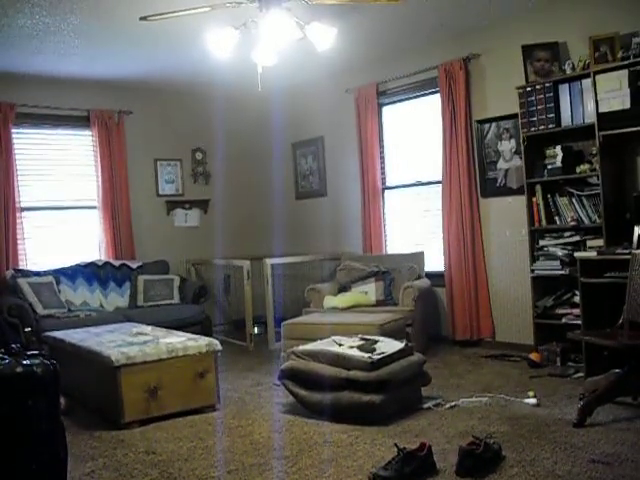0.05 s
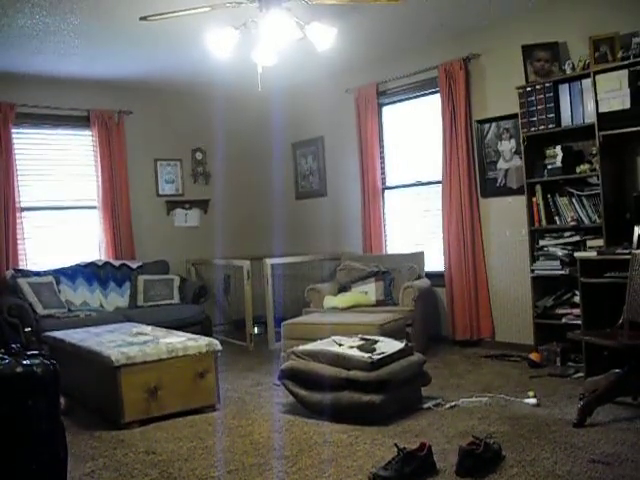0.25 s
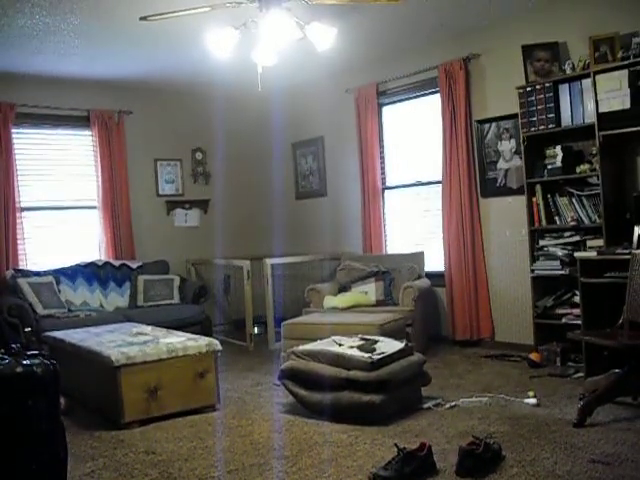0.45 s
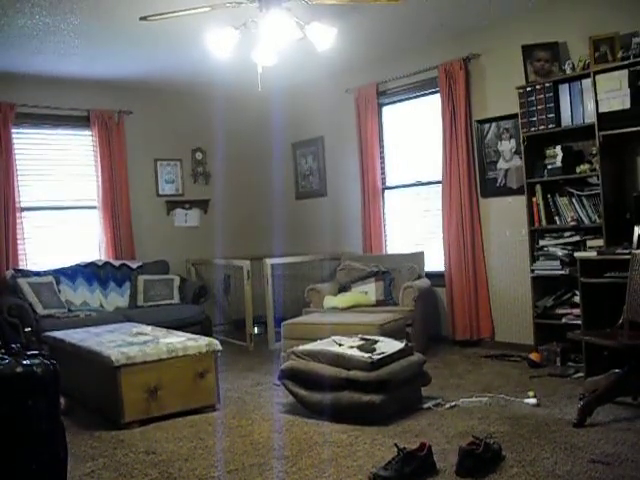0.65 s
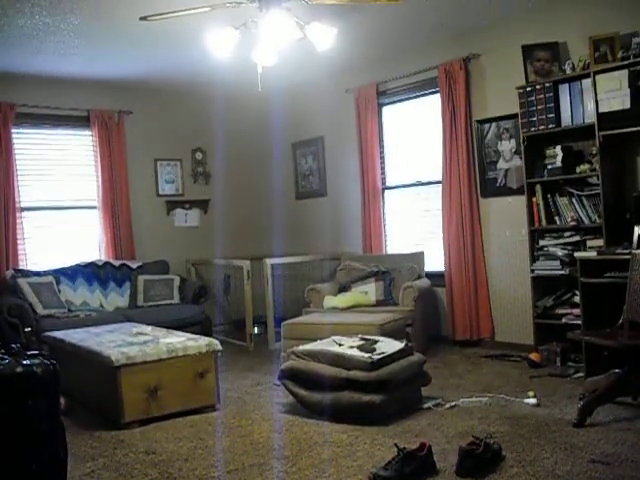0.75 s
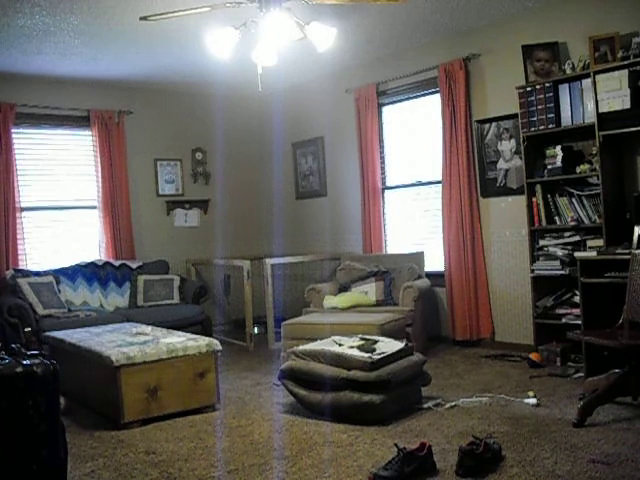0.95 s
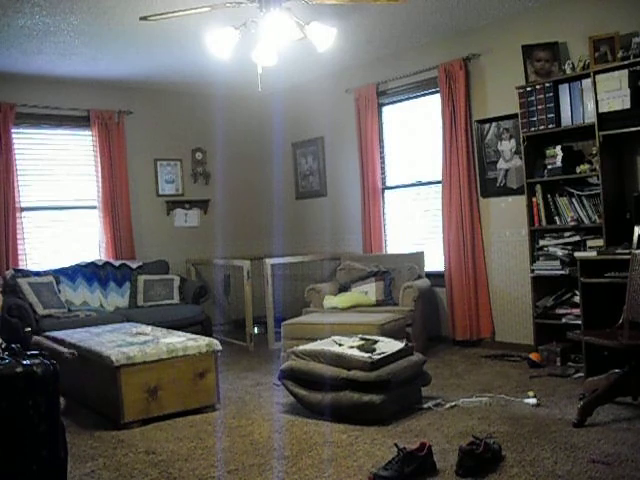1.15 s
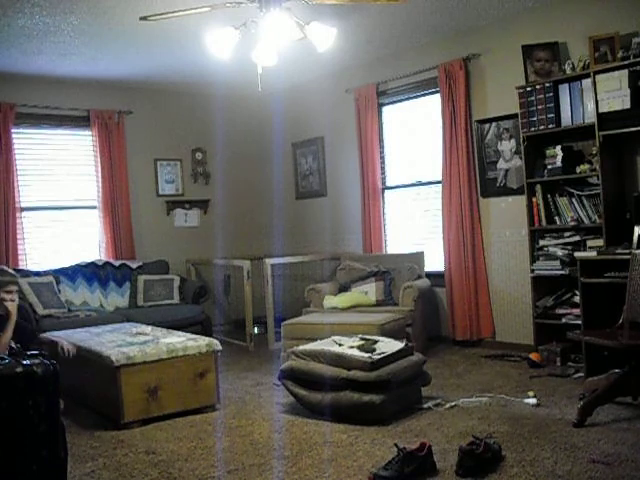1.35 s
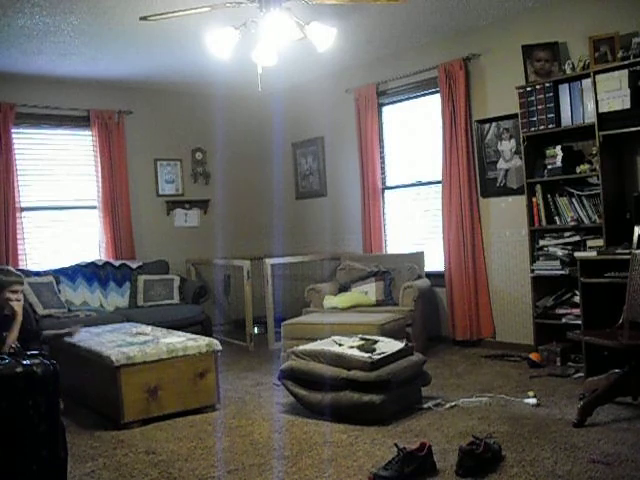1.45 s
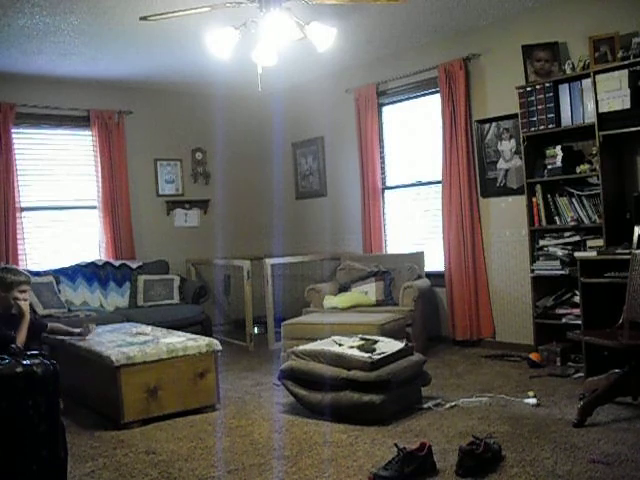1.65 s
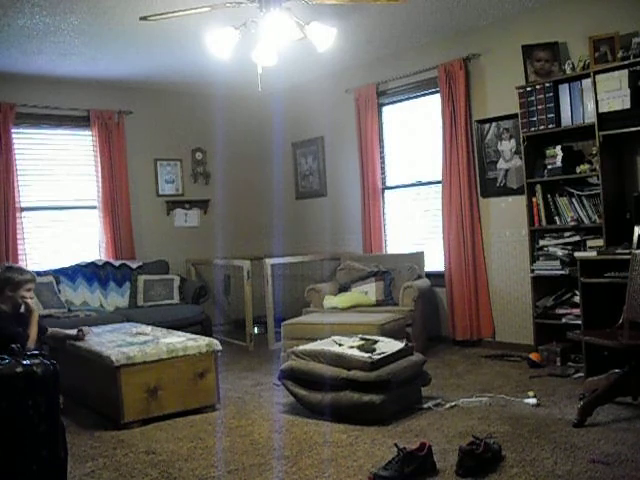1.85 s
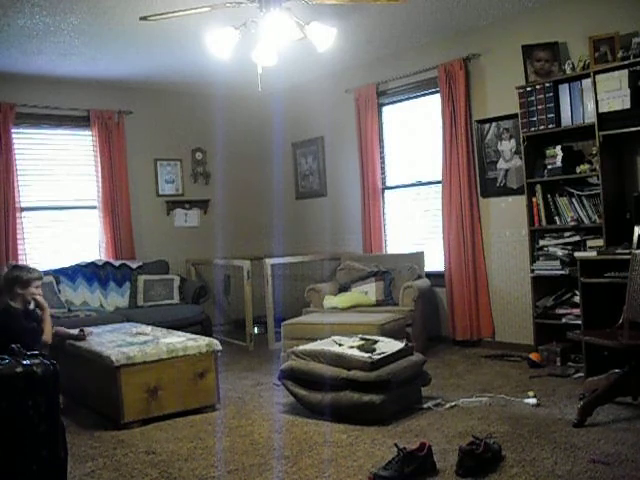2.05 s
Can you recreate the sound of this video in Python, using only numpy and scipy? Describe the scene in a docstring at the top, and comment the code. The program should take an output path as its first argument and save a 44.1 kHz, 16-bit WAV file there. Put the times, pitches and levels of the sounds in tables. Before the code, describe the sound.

A soft low thump, probably a foot landing on carpet, briefly booms through a quiet living room floor. Wood taps faintly just before and knocks lightly afterward. One fixed microphone also picks up a low ventilation drone and hiss.

```python
"""A soft weight, probably a foot, lands in a few quick pushes and sets a living-room floor booming.
The room is quiet and carpeted, heard in mono from one fixed microphone. Cloth rustles with the landing.
Something wooden taps faintly just before it and knocks again a second in, after a tiny tick.
Behind it all lie a low ventilation drone, room air, a thin electrical whine and the microphone's hiss."""
import sys
import numpy as np
from scipy import signal
from scipy.fft import rfft, irfft
from scipy.io import wavfile

SR = 44100
rng = np.random.default_rng(int(sys.argv[2]) if len(sys.argv) > 2 else 0)


def bounce(signal):
    """Save signal as a 16-bit WAV file at the path given by the first command-line argument."""
    frames = np.transpose(np.atleast_2d(signal))
    limited = np.clip(frames, -1, 1)
    pcm = np.round(limited * 32767).astype(np.int16)
    wavfile.write(sys.argv[1], SR, pcm)


N = 92610

# pushes on the carpet (time [s], relative level [dB], contact time [s])
FOOT_PUSHES = [(0.2065, -14, 0.0041), (0.2287, -3.2, 0.005), (0.2635, -12, 0.0048), (0.2902, -2, 0.003),
               (0.3523, -9, 0.0023)]
# modes of the floor and the room above it (frequency [Hz], level [dB], t60 [s])
FLOOR_MODES = [(32.2, -29, 0.64), (53.82, -20, .55), (70.1, -36, 0.89), (105, -49, .22), (163, -44.5, 0.13)]


def footfall():
    """Pushes cushioned by the carpet, each a smooth pulse of force, set the floor ringing."""
    force = np.zeros(N)
    for at, db, contact in FOOT_PUSHES:
        push = np.exp(-(2 * (seconds() - at) / contact) ** 2)
        force += undb(db) * push / push.sum()
    return signal.fftconvolve(force, ring(FLOOR_MODES))[:N]


# knocks on wood (time [s], relative level [dB])
WOOD_KNOCKS = [(0.16, -19), (1.053, -3)]
# the contact's crack, straight to the microphone (frequency [Hz], relative density [dB])
CRACK_SPECTRUM = [(400, -16), (1000, 8), (1500, 8), (2400, -13), (4000, -26), (8000, -24), (15000, -40)]
# modes of the knocked wood (frequency [Hz], level [dB], t60 [s])
WOOD_MODES = [(267.5, -41, 0.22), (636, -71, 0.097), (795, -53.5, 0.35), (1100, -75, 0.24),
              (1191, -51.5, .18), (1573, -50.5, 0.093)]
# reflections off walls and furniture (frequency [Hz], relative density [dB])
REFLECTION_SPECTRUM = [(100, -1), (250, -3), (450, 1.5), (1200, -6.5), (1800, -11.5), (2700, -12.5),
                       (4200, -29), (8000, -31), (15000, -54)]


def wood_knocks():
    """A short crack, then the wood rings inside a dense cluster of room reflections."""
    knocks = np.zeros(N)
    for at, db in WOOD_KNOCKS:
        crack = undb(-43.5) * noise(CRACK_SPECTRUM) * fade(at, t60=0.014)
        reflections = undb(-48.5) * noise(REFLECTION_SPECTRUM) * fade(at, t60=0.25, hold=0.023)
        knocks += undb(db) * (crack + ring(WOOD_MODES, at) + reflections)
    return knocks


# moving cloth (frequency [Hz], relative density [dB])
CLOTH_SPECTRUM = [(800, -18), (2000, 1.5), (3400, 4), (5500, -3), (8000, -3), (15000, -20)]


def cloth_rustle():
    """Cloth, faint at the microphone, swells with the landing and settles."""
    peak_s, rise_s, fall_s = 0.32, 0.12, 0.33
    age = seconds() - peak_s
    swell = np.exp(-np.maximum(-age / rise_s, age / fall_s))
    return undb(-67) * noise(CLOTH_SPECTRUM) * swell


# a tick somewhere in the room (frequency [Hz], relative density [dB])
TICK_SPECTRUM = [(1000, -14), (3000, 4), (6000, -10), (10000, -11), (15000, -20)]


def tick():
    """One tiny dry tick, barely above the microphone's hiss."""
    return undb(-54) * noise(TICK_SPECTRUM) * fade(start=0.871, t60=0.014)


def ventilation():
    """The ventilation drones in the background: one low tone, wavering in level and phase."""
    drone_hz, waver_depth = 74.8, 0.3
    waver = 1 + waver_depth * (wander(rate_hz=5) + 1j * wander(rate_hz=5))
    drone = np.real(waver * np.exp(2j * np.pi * drone_hz * seconds()))
    return undb(-55) * drone / drone.std()


# room air and microphone hiss (frequency [Hz], relative density [dB])
AIR_SPECTRUM = [(10, -20.5), (25, -0.5), (47, -3), (80, -5), (98, -9), (153, -11), (245, -14), (505, -20),
                (788, -25), (1770, -33), (4000, -38.5), (8000, -42.5), (15500, -45)]
# tones of the electrical whine (frequency [Hz], rms level [dB])
WHINE_TONES = [(1162, -84), (1583, -90), (5340, -90), (7866, -86.5)]


def room_tone():
    """The still room at the microphone: steady air and hiss with a trace of electrical whine."""
    whine = sum(undb(db) * np.sqrt(2) * np.sin(2 * np.pi * hz * seconds()) for hz, db in WHINE_TONES)
    return undb(-51) * noise(AIR_SPECTRUM) + whine


def undb(db):
    return 10 ** (np.asarray(db) / 20)


def seconds():
    return np.arange(N) / SR


def noise(spectrum):
    """Noise of rms 1, shaped by (frequency [Hz], relative density [dB]) points."""
    hz, db = np.array(spectrum).T
    bin_hz = np.maximum(np.arange(N // 2 + 1) * SR / N, 1)
    gain = undb(np.interp(np.log(bin_hz), np.log(hz), db))
    shaped = irfft(rfft(rng.standard_normal(N)) * gain, N)
    return shaped / shaped.std()


def wander(rate_hz):
    """Slow random drift with a spread of 1."""
    bin_hz = np.arange(N // 2 + 1) * SR / N
    drift = irfft(rfft(rng.standard_normal(N)) * np.exp(-(bin_hz / rate_hz) ** 2), N)
    return drift / drift.std()


def fade(start, t60, hold=0):
    """Sudden start, hold, then a fall of 60 dB every t60; all times in seconds."""
    age = seconds() - start
    return (age >= 0) * np.exp(-np.log(1000) * np.maximum(age - hold, 0) / t60)


def ring(modes, start=0):
    """Decaying modes set off at one moment."""
    age = seconds() - start
    return sum(undb(db) * np.sin(2 * np.pi * hz * age) * fade(start, t60) for hz, db, t60 in modes)


def scene():
    """The living room from one microphone position, in mono."""
    return (footfall() + wood_knocks() + cloth_rustle() + tick() + ventilation() + room_tone())[None]


def record(dry):
    """The recorder drops the slowest pressure changes and cuts the top steeply."""
    low_cut_hz, high_cut_hz = 2.2, 15700
    low_cut = signal.butter(1, low_cut_hz, "high", fs=SR, output="sos")
    high_cut = signal.ellip(12, .1, 70, high_cut_hz, fs=SR, output="sos")
    return signal.sosfilt(high_cut, signal.sosfilt(low_cut, dry))


dry = scene()
out = record(dry)
bounce(out)
```